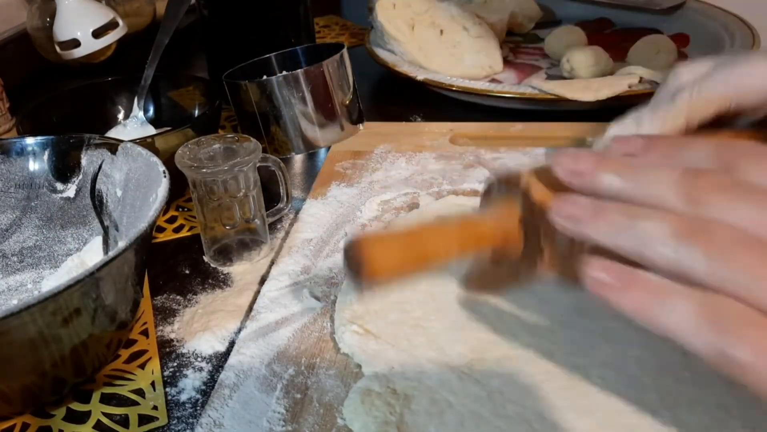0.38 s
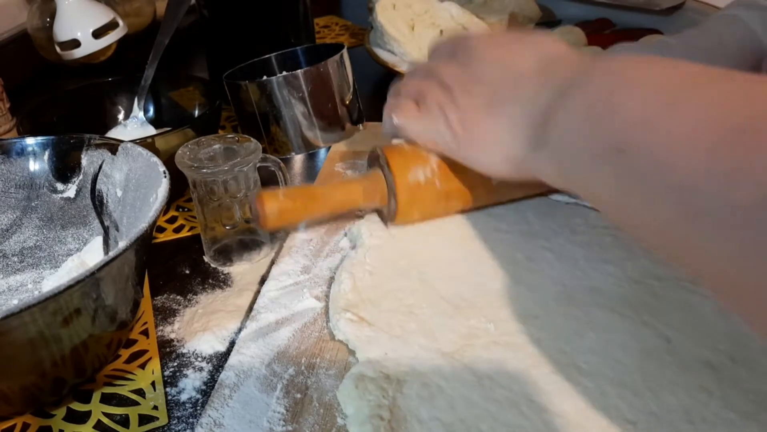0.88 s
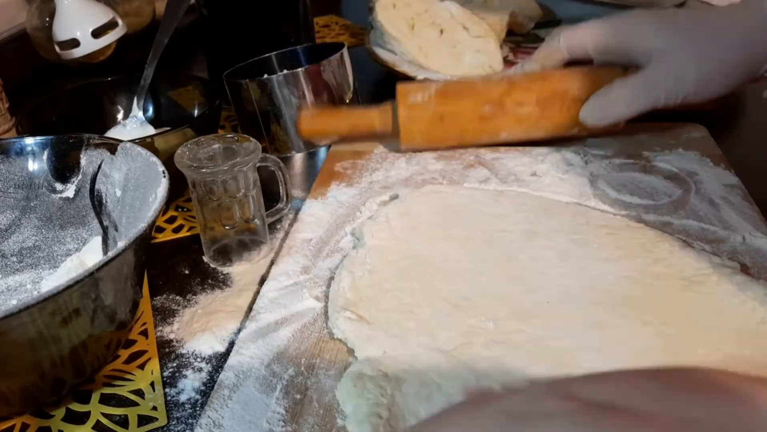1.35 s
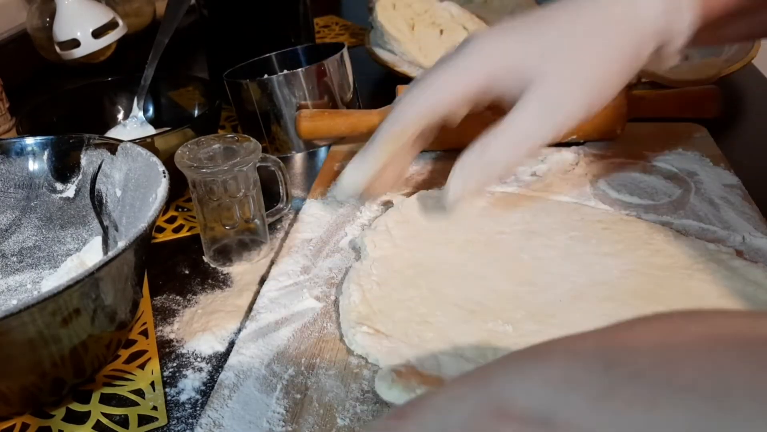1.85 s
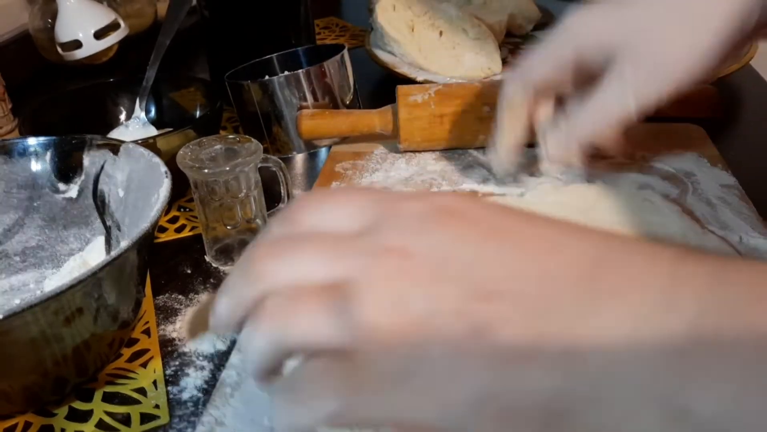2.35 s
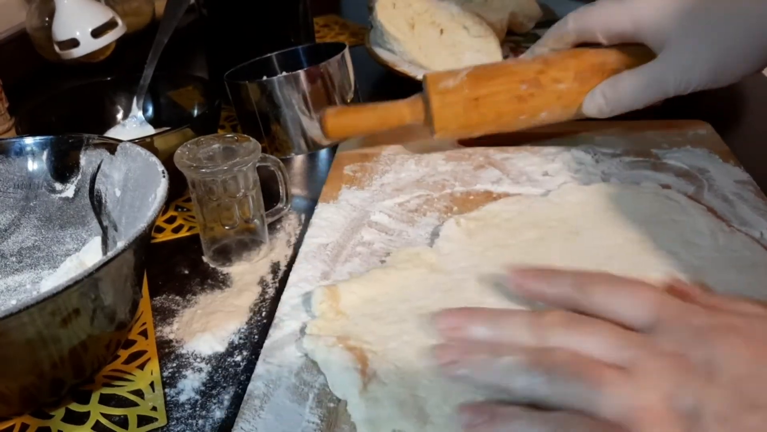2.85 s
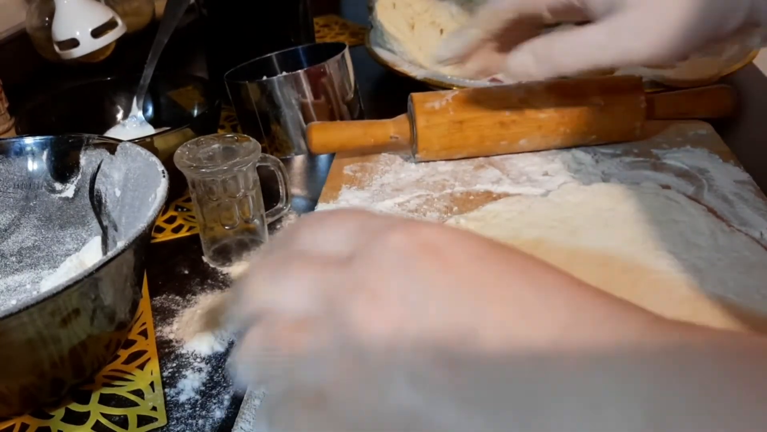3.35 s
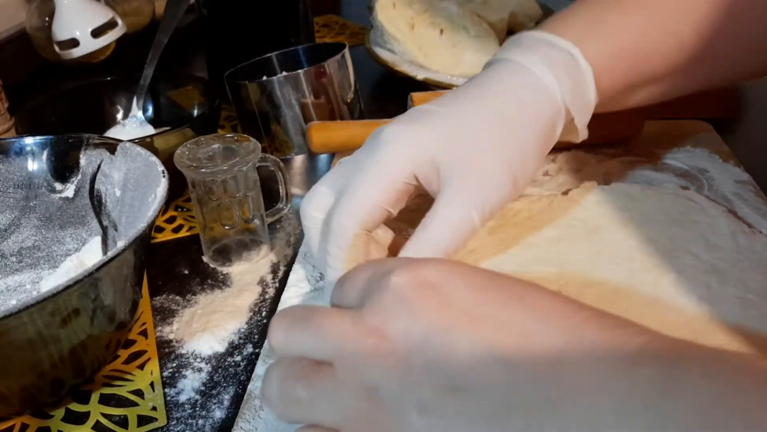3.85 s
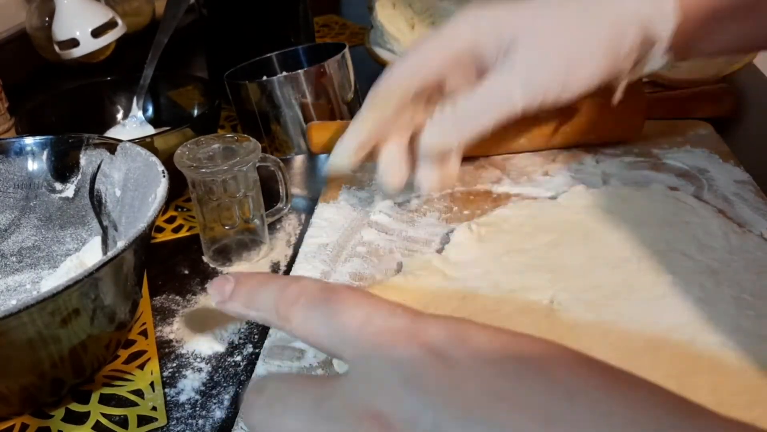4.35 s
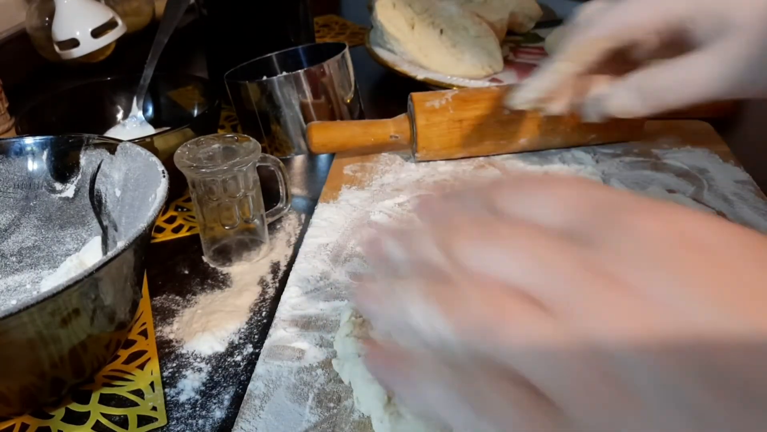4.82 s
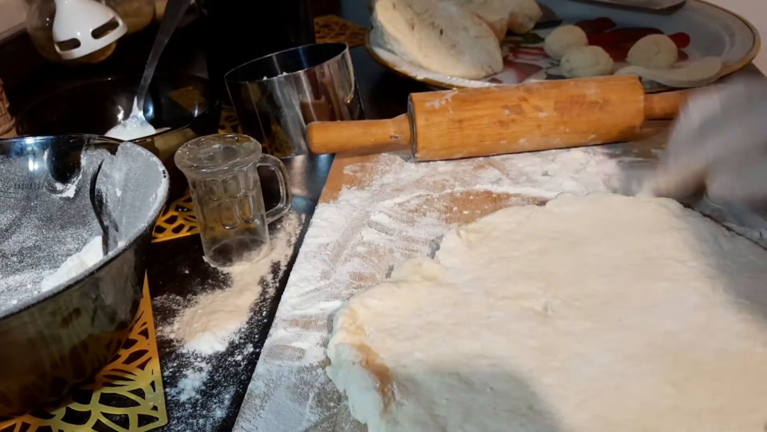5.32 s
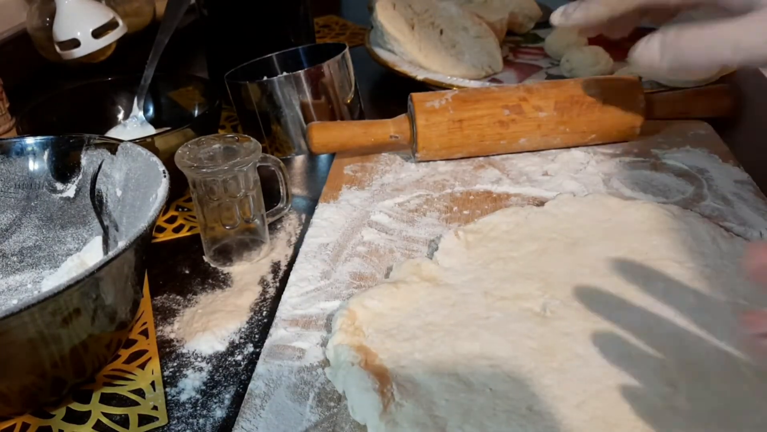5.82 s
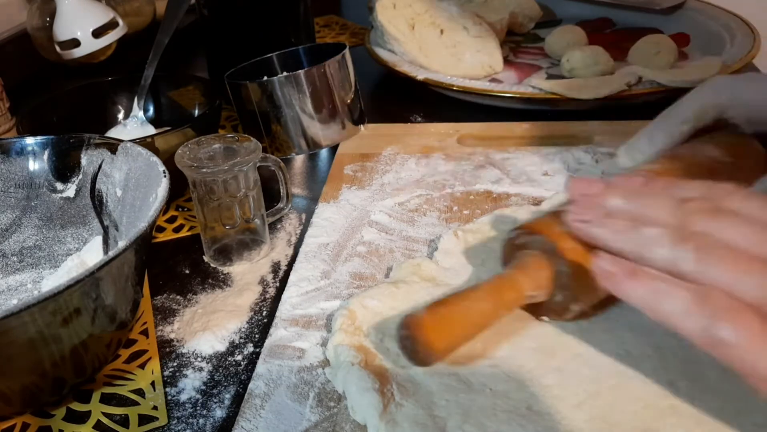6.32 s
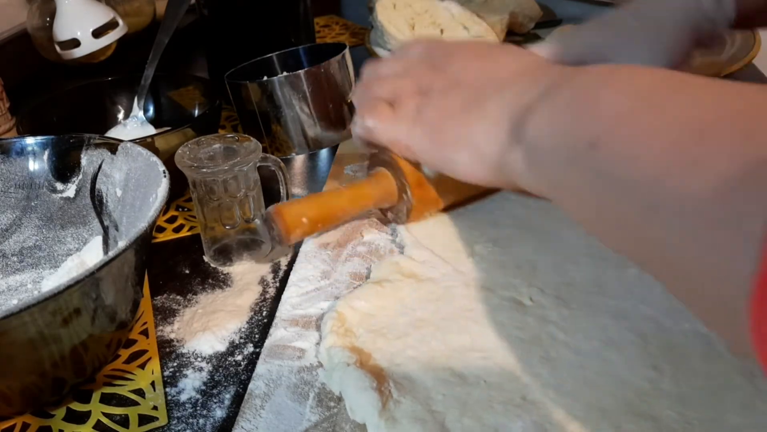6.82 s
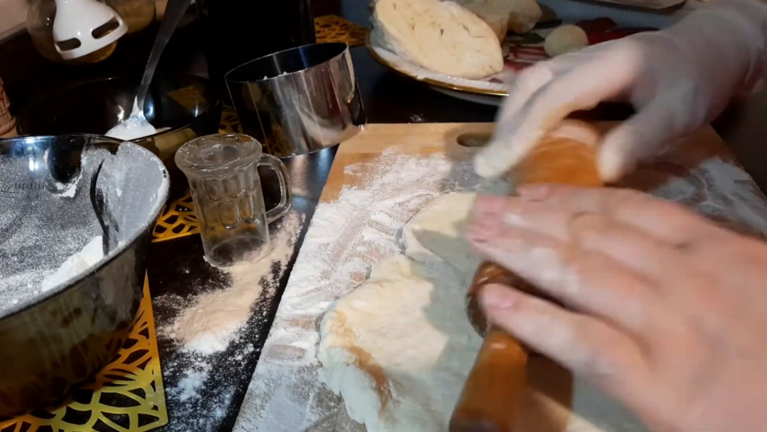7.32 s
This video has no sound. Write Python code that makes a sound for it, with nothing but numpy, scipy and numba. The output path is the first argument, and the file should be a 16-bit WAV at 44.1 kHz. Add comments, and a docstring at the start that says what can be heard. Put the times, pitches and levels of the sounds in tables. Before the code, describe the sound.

Two hard knocks of a rolling pin on a board punctuate quiet dough pressing and dry, floury glove rustles in a humming kitchen.

```python
"""A wooden rolling pin is set down on a pastry board: each blow rings decaying modes of pin and board. Gloved
hands and the pin brush flour (gated, coloured noise with a scrape), press dough and tick; their weight thuds
into the kitchen counter, whose low modes ring. Glassware rattles with the blows and a short noise tail answers
as the room. A refrigerator hums in wavering tones over room noise; two microphones are close by."""
import sys
import numpy as np
from scipy import signal
from scipy.fft import rfft, irfft
from scipy.io import wavfile
from scipy.ndimage import uniform_filter1d
from numba import njit

SR = 44100
rng = np.random.default_rng(int(sys.argv[2]) if len(sys.argv) > 2 else 0)


def undo_db(level):
    """Turn decibels back into plain size, where 20 dB means ten times bigger."""
    steps = np.asarray(level, float) / 20
    return 10 ** steps


def bounce(signal):
    """Save signal as a 16-bit WAV file at the path given by the first command-line argument."""
    frames = np.transpose(np.atleast_2d(signal))
    limited = np.clip(frames, -1, 1)
    pcm = np.round(limited * 32767).astype(np.int16)
    wavfile.write(sys.argv[1], SR, pcm)


N = 327663
T = np.arange(N) / SR
SLOW = T[::32]  # time base of hand movements
RIGHT_LAG_MS = 0.09  # the board is nearer to the left microphone

# Modes of the board. Each row: frequency in Hz, relative level in dB, t60 in seconds, left minus right in dB.
BOARD_MODES = [(279, -10.5, 0.12, 2.5), (359, -15.5, 0.14, -5), (393, -18.5, 0.024, -6.5),
               (552.7, 4.5, 0.11, -2.5), (600.3, 13, 0.065, -2.5), (734.3, 5.5, 0.11, 0),
               (813.6, 14.5, 0.04504, 3), (1006, -10.5, 0.36, 6.5), (1047, -2, 0.021, -3.5),
               (1197, 4, 0.04, 2.5), (1466, 19.5, 0.0061, -1.5), (1500, -2.5, 0.017, -35),
               (1680, 9, 0.033, 13.5), (1780, 17.5, 0.021, -4), (2239, 2, 0.089, -10),
               (2166, 0.5, 0.065, 10), (2630, -10.5, 0.013, -18), (2650, -14, 0.044, -4),
               (3050, -8, 0.0084, 10.5), (3700, -24, 0.011, -8.5)]


def level(x, db):
    """Scale to an rms level."""
    return x * undo_db(db) / np.sqrt(np.mean(x ** 2))


def colour(x, points):
    """Shape a spectrum by (Hz, dB) points, interpolated over log frequency."""
    hz, db = np.transpose(points)
    f = np.fft.rfftfreq(x.shape[-1], 1 / SR) + 1
    gain = undo_db(np.interp(np.log(f), np.log(hz), db))
    return irfft(rfft(x) * gain, x.shape[-1])


def walk(rate_hz):
    """Random levels held 1 / rate_hz s and slewed twice; spread near 1."""
    hold = int(SR / rate_hz)
    steps = np.repeat(rng.standard_normal(N // hold + 1), hold)
    return 1.3 * uniform_filter1d(uniform_filter1d(steps, hold), hold)[:N]


def sides(pan_db):
    """Left and right gains for a left minus right level difference."""
    return undo_db(np.array([pan_db, -pan_db]) / 2)


def pair(like):
    """Two noises with correlation like, 0-1."""
    mid, side = rng.standard_normal((2, N))
    like = np.clip(like, 0, 1)
    return np.sqrt(1 + like) * mid + np.sqrt(1 - like) * side * np.array([[1], [-1]])


@njit
def svf(x, hz, sharp):
    """Band-pass with a moving centre, gain 1 there."""
    y, band, low, damping = np.empty(len(x)), 0., 0., 1 / sharp
    for i in range(len(x)):
        g = np.tan(np.pi * hz[i] / SR)
        v = (band + g * (x[i] - low)) / (1 + g * (g + damping))
        band, low, y[i] = 2 * v - band, low + 2 * g * v, damping * v
    return y


def ring(hz, gain, t60, push_ms, lag_ms=0, spread_ms=0):
    """Decaying modes excited by a Gaussian push of sigma push_ms: a softer contact is longer and duller."""
    # bending waves: low ones travel slower; each mode is delayed by spread_ms times (root of 1 kHz over its
    # pitch, less 0.5)
    late_ms = np.array([0, lag_ms])[:, None] + spread_ms * (np.sqrt(1e3 / hz) - .5)
    t = np.maximum(T[:SR // 2] - late_ms[..., None] / 1e3, 0)
    decay = np.exp(-np.log(1000) * t / t60[:, None])
    modes = gain[..., None] * np.sin(2 * np.pi * hz[:, None] * t) * decay
    phase = T[:2048] * 1e3 / push_ms
    push = np.exp(-(phase - 3) ** 2 / 2)
    return signal.fftconvolve(modes.sum(axis=-2), push[None], axes=1)[:, :SR // 2]


def add(out, s, x, peak_db):
    """Place a hit, its louder channel peaking at peak_db."""
    i = int(s * SR)
    out[:, i:i + x.shape[1]] += (x * undo_db(peak_db) / np.abs(x).max())[:, :N - i]


def gestures(s, hold_s, rise_db_s, fall_db_s, round_s):
    """Gain of each gesture: swells, holds and dies at steady dB rates, shoulders rounded; long holds swell slower."""
    lazy_s = 0.15  # a gesture held this long swells half as fast
    hold_s = np.abs(hold_s)
    early = np.maximum(s[:, None] - SLOW, 0)
    late = np.maximum(SLOW - (s + hold_s)[:, None], 0)
    soft = lambda t: np.hypot(t, round_s) - abs(round_s)
    rise = (rise_db_s / (1 + hold_s / lazy_s))[:, None]
    return undo_db(-np.minimum(rise * soft(early) + fall_db_s * soft(late), 200))


def summed(gains):
    """Overlapping gestures add in power."""
    return np.interp(T, SLOW, np.sqrt(np.sum(gains ** 2, axis=0)))


def fridge():
    """Motor and casing tones, each a steady line with a narrow noisy skirt that makes it waver."""
    # Each row: frequency in Hz, rms level before panning in dB, waver share (capped at 0.8), left minus right in dB.
    hum_tones = [(151.5, -57.5, 0.93, 6), (203.5, -58.5, 0.33, 2.5), (239, -72, 0.45, -2.5),
                 (294.8, -64, 0.78, 1), (338.7, -67.5, .3, -7.5), (442.5, -54.5, 0.23, -4),
                 (588, -75.5, 0.16, -23), (1925, -83, 0.13, 21.5)]
    out = 0
    for hz, db, waver, pan_db in hum_tones:
        swing = 1 + np.clip(waver, 0, .8) * (walk(14) + 1j * walk(14))
        tone = np.imag(swing * np.exp(2j * np.pi * (hz * T + rng.random())))
        out = out + level(tone, db) * sides(pan_db)[:, None]
    return out


def air():
    """Room noise, the bass more alike in the two microphones than the treble."""
    # Colour laid over both noises. Each row: frequency in Hz, relative gain in dB.
    air_colour = [(15, -61.5), (25, -15), (195, -5), (384, -11), (439, -3), (516, -11), (575, -9),
                  (840, -29), (1560, -46), (1890, -34.5), (2280, -45), (5280, -54), (7920, -36.5),
                  (9320, -52.5), (16000, -51.5)]
    low = colour(pair(0.96), [(400, -16), (1500, -41.0)])
    high = colour(pair(0.66), [(400, -18), (1200, -11.5)])
    return level(colour(low + high, air_colour), -53)


def brushing():
    """Flour grains slip under glove and pin: a grainy hiss with a scrape in it, and an airy top."""
    # Strokes of glove or rolling pin over flour. Each row: time of full speed in seconds, level in dB, hold in
    # seconds, # scrape pitch in Hz, fine flour in dB against the stroke.
    stroke_rows = [(0.061, -70.5, .003, 6090, 6), (0.123, -66.5, .003, 4545, -13),
                   (0.239, -80, 0.074, 5450, 2), (0.43, -75.5, .05, 5850, 5), (0.49, -64.5, .03, 5600, 0.6),
                   (0.513, -59.5, 0.11, 5264, -2), (0.68, -63, 0.2, 4400, 0),
                   (0.84, -56.5, 0.053, 6070, -3), (0.929, -60, 0.05, 4570, -4),
                   (1.088, -62.5, 0.054, 2527, -5.5), (1.166, -71, 0.13, 5310, 2.5),
                   (1.354, -61.5, 0.11, 2730, -4), (1.49, -68.5, .05, 3493, -4.5),
                   (1.558, -52.5, 0.007, 5050, -14), (1.618, -65, 0.11, 5680, -7),
                   (1.9, -68.5, .02, 7000, -12), (1.95, -64, 0.0069, 5500, -11.5),
                   (1.99, -51.5, 0.019, 6296, -7.5), (2.08, -48.5, 0.016, 3610, -5),
                   (2.12, -44, 0.021, 3506, -6), (2.202, -54, 0.06, 3700, -3),
                   (2.276, -49, 0.062, 3700, -6), (2.615, -65.5, 0.1, 5570, 0),
                   (2.721, -59.5, 0.05, 2740, -2), (2.794, -57, .01, 3050, -1),
                   (2.874, -66, 0.018, 2954, -4), (3.003, -63, .05, 2870, -9),
                   (3.093, -67, 0.094, 5090, -4), (3.192, -58.5, 0.095, 2700, -11.5),
                   (3.57, -76, .04, 6160, -14.5), (3.63, -56.5, .03, 5840, -10),
                   (3.682, -45, 0.027, 5290, -10.5), (3.86, -53, 0.072, 4700, -11),
                   (4.003, -51.5, 0.0043, 5500, -11.5), (4.15, -58.5, .02, 5800, -7.5),
                   (4.186, -47.5, 0.14, 5220, -8), (4.615, -55, 0.031, 6300, -5.5),
                   (4.66, -51, 0.03, 5567, -9.5), (4.941, -69.5, 0.0018, 4932, 0),
                   (5.065, -55.5, 0.039, 5510, -10.5), (5.117, -46.5, 0.013, 5466, -11),
                   (5.23, -66, 0.11, 5200, -3), (5.39, -52, 0.043, 4910, -5.5),
                   (5.476, -58, 0.02, 5084, -6), (5.641, -68, 0.011, 5556, -11),
                   (5.668, -57.5, .04, 5210, -6.5), (5.952, -61, 0.069, 6400, 1),
                   (6.097, -78.5, 0.043, 5840, 0.5), (6.199, -68.5, 0.17, 6200, 3.5),
                   (6.333, -61.5, 0.08, 5600, -2), (6.447, -58.5, 0.049, 5440, 4),
                   (6.514, -66, 0.13, 5240, 0), (6.701, -59, 0.13, 5550, -1.2),
                   (6.817, -64.5, 0.16, 5300, -7), (7.059, -66, .1, 5770, -4.5),
                   (7.171, -64.5, .1, 5510, -0.5), (7.315, -52, .05, 6220, -3),
                   (7.399, -57, 0.035, 5800, 2)]
    # Where the hands work. Each row: time in seconds, left minus right in dB before the offsets below.
    hand_path = [(0, 2), (.6, 0), (.85, 9), (1.3, 4), (2.0, 7), (2.6, 3.5), (3.7, 6), (4.3, 4.5), (5.1, 1),
                 (5.8, -0.5), (6.0, 3), (6.5, 3.5), (6.8, 7.5), (7.2, 1), (7.43, 5.5)]
    # Hiss of the fingers. Each row: frequency in Hz, relative density in dB per Hz.
    finger_colour = [(1180, -27.5), (2000, -6), (2340, -69), (2600, -1.5), (3180, -5.5), (3590, -1),
                     (4220, -0.5), (5070, 0.5), (6540, 2.5), (8010, 10), (10000, -20.5), (13000, -36.5),
                     (22000, -120)]
    # Airy top of fine flour. Each row: frequency in Hz, relative density in dB per Hz.
    flour_colour = [(5000, -42.5), (8500, -4), (9610, -8), (12400, -3.5), (15000, -3), (15700, -21.5)]
    s, db, hold_s, hz, flour_db = np.transpose(stroke_rows)
    strokes = undo_db(db)[:, None] * gestures(s, hold_s, rise_db_s=1100, fall_db_s=241, round_s=.005)
    power = strokes ** 2
    scrape_hz = np.interp(T, SLOW, hz @ power / np.sum(power, axis=0))  # the loudest stroke leads
    pan_db = np.interp(T, *np.transpose(hand_path))
    grain = undo_db(1.5 * walk(60) + 1.5 * walk(300) + 1.2 * walk(25))
    fingers = level(colour(pair(0.034) * grain, finger_colour), 0)
    flour = level(colour(pair(0.066) * grain, flour_colour), 0)
    scrape = np.array([svf(x, scrape_hz, 3.7) for x in pair(0.097) * grain])
    fingers = fingers + level(scrape * undo_db(2 * walk(30)), -4)  # dB against the hiss
    airy = summed(strokes * undo_db(flour_db)[:, None])
    return summed(strokes) * fingers * sides(pan_db + 1.0) + airy * flour * sides(0.726 * pan_db - 10.0)


def thuds():
    """Weight of hands: soft pushes ring the low modes of the counter, 3 dB stronger on the left."""
    # Each row: start in seconds, peak in dB, push length in ms (five sigma).
    thud_rows = [(0.115, -39, 3.4), (0.552, -35.5, 7.5), (0.951, -37, 2.6), (1.418, -36, 7.2),
                 (1.549, -33, 1.4), (1.687, -56, 4.9), (2.08, -32.5, 3.65), (3.003, -31.5, 9.5),
                 (3.166, -30, 8.3), (3.232, -29.5, 8.4), (3.857, -40.5, 2.3), (4.638, -44, 9.2),
                 (5.357, -39, 5.2), (5.438, -37.5, 5.3), (5.624, -38.5, 1.5), (5.678, -37, 1.7),
                 (5.958, -39, 4.7), (6.321, -37, 4.9), (6.499, -38, 2.7), (7.153, -55, 14),
                 (7.348, -32.5, 2.2)]
    # Each row: frequency in Hz, relative level in dB, t60 in seconds.
    counter_modes = [(62.8, -20, .2), (87.3, 4, 0.37), (114.6, -3.5, 1), (154.4, 7, 0.28), (200, -1.5, 0.2),
                     (288.8, -6, 0.077)]
    out = np.zeros((2, N))
    hz, db, t60 = np.transpose(counter_modes)
    gain = undo_db(db) * (-1.) ** np.arange(len(hz))  # alternating polarity
    for s, peak_db, push_ms in thud_rows:
        thud = ring(hz, gain, t60, max(push_ms / 5, .1))
        add(out, s, thud * sides(3.0)[:, None], peak_db)
    return out


def knocks():
    """Blows ring pin and board, the spot picking board modes; contact noise and glassware come apart, as bright."""
    # Wood on wood. Each row: time in seconds (sounds 1 ms later), peak before the high-pass in dB,
    # left minus right in dB, contact sigma in ms, spot on the board 0-1.
    knock_rows = [(0.115, -43.5, 2, 0.044, 0.42), (0.549, -44, 2, 0.15, 0.3),
                  (1.3482, -32.5, -3, 0.05, 0.42), (1.358, -36.5, 0.5, 0.045, 0.32),
                  (1.371, -32, 7, 0.06, 0.4), (1.4193, -4.5, 4.5, 0.1, 0.4), (3.0036, -13.5, 6, 0.17, 0.4),
                  (3.166, 2.5, 2, 0.054, 0.42), (5.633, -44.5, -1, 0.058, 0.4),
                  (6.332, -41.5, -3.5, 0.1, 0.32), (6.364, -40.5, -12, 0.18, 0.42)]
    # Quick, broad modes of the pin. Each row: frequency in Hz, relative level in dB, t60 in seconds,
    # left minus right in dB.
    pin_modes = [(780, 0.5, 0.016, -18), (1200, -6.5, 0.0096, -1.5), (1650, -11, 0.00067, 2.5),
                 (2400, -4, 0.0087, -13.5), (2672, 6.5, .008, 0.5)]
    # Each row: frequency in Hz, relative level in dB, t60 in seconds.
    glass_modes = [(4340, -5, .05), (4696, -7, 0.076), (4950, -7, .04), (6120, 1, .025), (7050, -7, 0.03)]
    pin_base_db, pin_db_per_ms = 7, 71.5  # a longer contact rings the pin more than the board
    # Against the blow, ahead of the gains in scene(); the rattle's ratio grows in dB per dB of blow.
    rattle_db, rattle_growth, crack_db = -36.5, 2.2, -36
    crack_decay_s, crack_hz = 0.0087, 4700
    radiates_hz = 200  # pin and board are too small to radiate below this
    out, bright = np.zeros((2, 2, N))
    hz, db, t60, pan_db = np.transpose(BOARD_MODES)
    pin_hz, pin_db, pin_t60, pin_pan_db = np.transpose(pin_modes)
    glass_hz, glass_db, glass_t60 = np.transpose(glass_modes)
    t = T[:8192]
    shake_decay = np.exp(-t / 0.0071) + undo_db(-9.5) * np.exp(-t / 0.057)
    shakes = rng.standard_normal((len(knock_rows), 8192)) * shake_decay
    glass = ring(glass_hz, undo_db(glass_db), glass_t60, 0.017) * sides(16)[:, None]
    band = np.full(2048, 1. * crack_hz)
    for (s, peak_db, side_db, contact_ms, spot), shake in zip(knock_rows, shakes):
        push_ms, side = max(contact_ms, .02), sides(side_db)[:, None]
        shape_db = 5 * np.cos(2 * np.pi * spot * np.sqrt(hz / 60))  # plate waves shorten with the root of pitch
        board = ring(hz, undo_db(db + shape_db) * sides(pan_db), t60, push_ms, RIGHT_LAG_MS, spread_ms=1.71)
        pin_gain = -undo_db(pin_db + pin_base_db + pin_db_per_ms * contact_ms) * sides(pin_pan_db)
        pin = ring(pin_hz, pin_gain, pin_t60, push_ms, RIGHT_LAG_MS)
        add(out, s + 0.001024, (board + pin) * side, peak_db)
        crack = svf(svf(rng.standard_normal(2048), band, 1.5), band, 1.5)
        crack = crack * np.exp(-T[:2048] / crack_decay_s)
        add(bright, s + .001, crack * side, peak_db + crack_db)
        rattle = signal.fftconvolve(glass, shake[None], axes=1)
        add(bright, s + 0.0058, rattle, peak_db + rattle_db + rattle_growth * peak_db)
    high_pass = signal.butter(2, radiates_hz, "high", fs=SR, output="sos")
    return signal.sosfilt(high_pass, out), bright


def room(x):
    """Dense echoes of the kitchen walls as decaying noise; the treble dies first."""
    # Colour of the tail. Each row: frequency in Hz, gain in dB.
    tail_colour = [(60, -11.5), (180, 0.5), (300, 0), (600, -3.5), (1000, 1.5), (1600, -3), (2300, 7.5),
                   (3000, -2), (3600, -4.5), (5000, 1.5), (12000, -19)]
    bass_t60_s, treble_t60_s = .42, .36
    tail_db = 6  # echo energy against the blow, before tail_colour
    t = T[:int(.7 * SR)]
    source = (x[0] + np.roll(x[1], -round(RIGHT_LAG_MS * SR / 1e3))) / 2  # the blow as it left the board
    noise = rng.standard_normal((2, 2, len(t)))
    # long bass waves reach both microphones alike
    shared = colour(noise[0, 0], [(300, 3.5), (900, -23)])
    noise[0, 1] = shared + colour(noise[0, 1], [(300, -4), (900, 0)])
    low = colour(noise[0], [(1500, 1.5), (5000, -29)]) * np.exp(-np.log(1000) * t / bass_t60_s)
    high = colour(noise[1], [(1500, -20.5), (5000, 10)]) * np.exp(-np.log(1000) * t / treble_t60_s)
    echo = (low + high) * np.clip(t / 0.0046, 0, 1)
    echo = echo + 0.065 * echo[::-1]  # each microphone hears part of the other's echoes
    echo = echo / np.sqrt(np.sum(echo ** 2) / 2)
    tail = signal.fftconvolve(source[None], echo, axes=1)[:, :N]
    return undo_db(tail_db) * colour(tail, tail_colour)


def ticks():
    """Ticks of glove and crumbs: one broad resonance each, down 60 dB in 8 cycles."""
    # Each row: start in seconds, peak in dB, frequency in Hz, left minus right in dB.
    tick_rows = [(0.1166, -41, 4000, 3.5), (0.5494, -48, 3500, 2.5), (1.9854, -34, 8000, 8.5),
                 (5.6331, -48, 4000, 0.1), (5.664, -38, 9000, 0.6), (6.264, -40, 10000, 4),
                 (6.3654, -30, 8500, 4.5)]
    out = np.zeros((2, N))
    for s, peak_db, hz, pan_db in tick_rows:
        tick = ring(np.array([hz]), np.ones(1), np.array([8 / hz]), push_ms=.012)
        add(out, s, tick * sides(pan_db)[:, None], peak_db)
    return out


def pressing():
    """The palm rubs the dough, and the drag murmurs in the middle modes of the board."""
    # Drags of the palm. Each row: time of full weight in seconds, rub in dB, hold in seconds, board murmur in dB.
    drag_rows = [(0.137, -81, .003, -64), (0.334, -84, 0.0033, -95), (0.543, -68, .03, -58),
                 (0.62, -64, 0.3, -62), (0.925, -57, 0.029, -56), (1.09, -68, 0.059, -80),
                 (1.21, -71, 0.043, -61.5), (1.9, -84, 0.16, -69), (2.12, -50.5, 0.022, -56),
                 (2.202, -53.5, 0.071, -61), (2.289, -50.5, 0.043, -59), (2.733, -54, 0.035, -50.5),
                 (2.789, -61, 0.045, -43), (3.695, -57, 0.032, -59.5), (3.907, -81.5, 0.14, -73),
                 (4.211, -59.5, .12, -63.5), (4.674, -68, 0.027, -64), (4.81, -75, 0.015, -62.5),
                 (4.927, -70, 0.037, -61.5), (5.136, -62.5, 0.022, -65.5), (5.43, -68.5, .005, -75),
                 (5.64, -79.5, .02, -72.5), (5.987, -76, .02, -66), (6.351, -65.5, 0.11, -64),
                 (6.502, -57.5, 0.08, -62.5), (6.664, -67, 0.22, -67.5), (6.896, -76, 0.07, -74),
                 (7.152, -64, .08, -58), (7.341, -73, .1, -59)]
    # Each row: frequency in Hz, relative density in dB per Hz.
    palm_colour = [(590, -65), (1000, -20.5), (1070, -17.5), (1330, -2.5), (1990, 7), (2350, 2.5),
                   (3160, 0), (3700, -10.5), (4500, -3), (5850, -30.5), (9900, -120)]
    s, rub_db, hold_s, murmur_db = np.transpose(drag_rows)
    drags = gestures(s, hold_s, rise_db_s=420, fall_db_s=220, round_s=0.0032)
    slip = undo_db(2 * walk(40) + 2 * walk(200))
    hz, db, t60, _ = np.transpose([mode for mode in BOARD_MODES if 600 < mode[0] < 1600])
    murmur = signal.fftconvolve(pair(0.093) * slip, ring(hz, undo_db(db), t60, 0.1), axes=1)[:, :N]
    rub = level(colour(pair(0.033) * slip, palm_colour), 0) * sides(1.0)[:, None]
    rub_gain = summed(undo_db(rub_db)[:, None] * drags)
    murmur_gain = summed(undo_db(murmur_db)[:, None] * drags)
    return rub_gain * rub + murmur_gain * level(murmur, 0)


def scene():
    """Hits and their tail over the work of the hands and the hum of the room."""
    wood, bright = knocks()
    hits = wood + ticks() + 0.35 * bright
    # bright reaches the microphones at 1.35 in all, the room at 0.35
    return hits + bright + room(hits) + thuds() + brushing() + pressing() + fridge() + air()


def low_pass(x):
    """Removes everything above the highest recorded frequency."""
    return signal.sosfilt(signal.butter(12, 16510, fs=SR, output="sos"), x)


def record(dry):
    """The microphones cut the deep bass, the input stage rounds the highest peaks."""
    heard = signal.sosfilt(signal.butter(2, 80, "high", fs=SR, output="sos"), dry)
    heard = heard / (1 + np.abs(heard / .95) ** 4) ** .25
    return low_pass(heard)


dry = scene()
out = record(dry)
bounce(out)
```